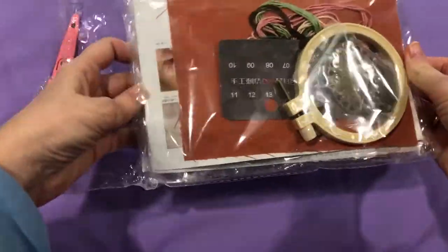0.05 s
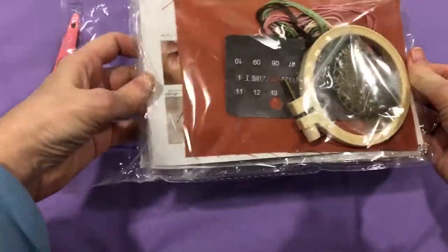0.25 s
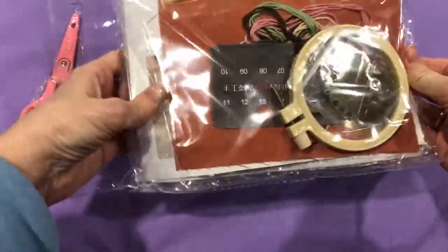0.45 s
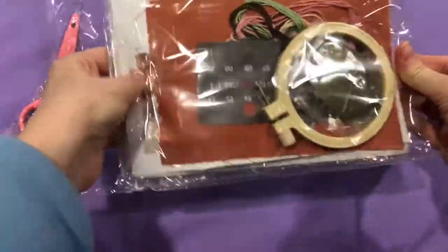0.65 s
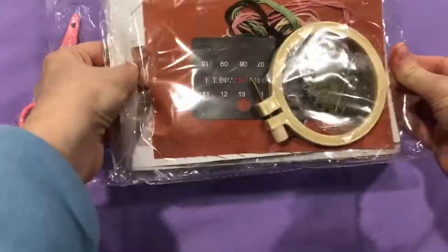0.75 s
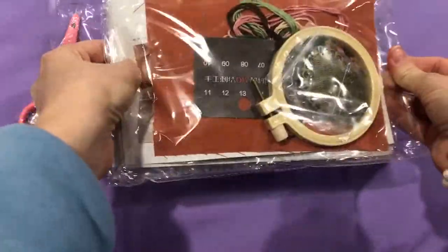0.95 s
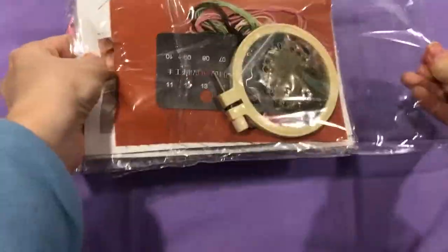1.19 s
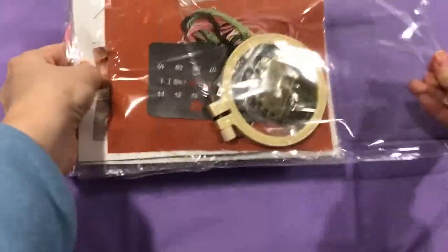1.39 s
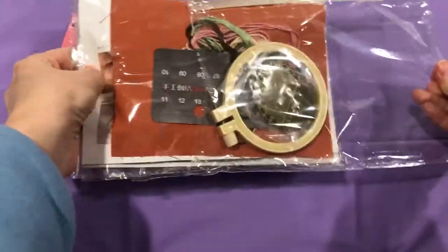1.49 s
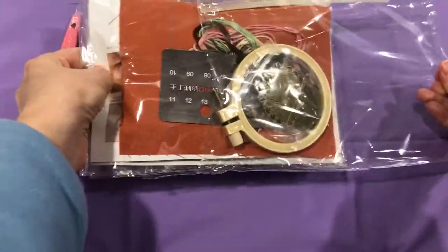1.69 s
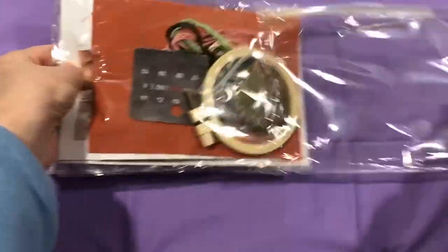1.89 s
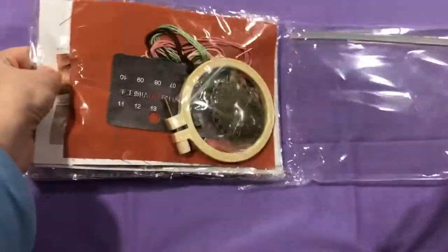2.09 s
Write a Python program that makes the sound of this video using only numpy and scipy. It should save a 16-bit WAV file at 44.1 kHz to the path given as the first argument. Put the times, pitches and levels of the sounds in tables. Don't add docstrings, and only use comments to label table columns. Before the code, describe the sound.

Stiff clear plastic crinkles close to a phone microphone. Crisp high snaps gather from 0.1 to 0.4 seconds, scatter through a new grip with dull panel pops near 0.7, then crowd into the loudest crackling, sliding rustle around 0.95-1.1. Sparse ticks and soft pops follow until a second burst at 1.73-1.85, thinning to a late snap near 2.1. Quiet, dry room.

```python
import sys
import numpy as np
from scipy import signal
from scipy.fft import rfft, irfft, next_fast_len
from scipy.io import wavfile
from scipy.ndimage import uniform_filter1d, map_coordinates

SR = 44100
rng = np.random.default_rng(int(sys.argv[2]) if len(sys.argv) > 2 else 0)


def volts_from_decibels(level):
    exponent = np.asarray(level, float) / 20
    return 10 ** exponent


def unload_audio(sound):
    columns = np.transpose(np.atleast_2d(sound))
    steps = np.round(np.clip(columns, -1, 1) * 32767)
    wavfile.write(sys.argv[1], SR, steps.astype(np.int16))


N = 94329

# start_s [s], energy_db [dB], centre_hz
# [Hz]
CREASE_SNAPS = [(0.06, -23, 6060), (0.0857, -17.5, 6900), (0.0882, -20, 6500), (0.0963, -14.5, 6500),
                (0.0998, -16.5, 6940), (0.154, -25, 3200.0), (0.1623, -18, 9200), (0.165, -13, 5530),
                (0.1787, -11, 11400), (0.2222, -13.5, 4850), (0.2503, -10, 6430), (0.2722, -18, 5300),
                (0.2765, -20, 3060), (0.2791, -6, 5040), (0.2853, -11.5, 6600), (0.3032, -20.5, 5400.0),
                (0.306, -22.5, 4500.0), (0.3142, -19, 2540), (0.3184, -5.5, 5500), (0.3325, -13.5, 2970),
                (0.3367, -6.5, 8100), (0.3434, -7.5, 9500), (0.364, -10.5, 5830), (0.365, -18, 3860),
                (0.3945, -9.5, 4430),
                (0.4151, -14, 6000), (0.4205, -26, 3950), (0.4558, -29, 3830), (0.481, -24.5, 4500),
                (0.5129, -13, 8150), (0.5188, -14, 9800), (0.5243, -11.5, 4030), (0.5437, -19.5, 6200.0),
                (0.5607, -25, 2170), (0.572, -20, 8900), (0.585, -20, 3520), (0.595, -13, 4020),
                (0.6149, -7, 5130), (0.6208, -14, 6450), (0.637, -16, 10700.0), (0.6496, -12.5, 2950),
                (0.6619, -16, 6360), (0.6661, -18, 5430), (0.69, -19.5, 3050), (0.6921, -21, 1710),
                (0.6994, -17, 4100), (0.7165, -18, 11300), (0.7503, -15.5, 2420), (0.759, -18, 6400),
                (0.779, -20.5, 3100),
                (0.796, -15, 6760), (0.8095, -22, 6940), (0.8289, -14, 5300), (0.8328, -18.5, 2960),
              (0.8436, -7.5, 13300), (0.8614, -16.5, 6740), (0.9049, -19, 4300), (0.9189, -15, 1320),
              (0.924, -16.5, 6700), (0.9394, -6.5, 5900), (0.9416, -20, 6130), (0.948, -9, 7600),
              (0.955, -26, 9800.0), (0.9591, -6, 12900), (0.97, -13, 2550), (0.974, -6, 8700),
              (0.9931, -7.5, 6400.0), (1.0061, -12.5, 3200), (1.0218, -5, 7300), (1.037, -9.5, 5900),
              (1.0606, -14.5, 7000), (1.067, -8, 8550), (1.0802, -19.0, 6300.0), (1.0833, -17, 4000.0),
              (1.088, -18.5, 2000),
                (1.093, -15.5, 7500), (1.1389, -19, 5650), (1.144, -22.5, 3730), (1.172, -29.5, 2100),
                (1.2113, -20.5, 4500), (1.217, -18, 5550), (1.235, -24, 1780), (1.247, -24, 3580),
                (1.2586, -7.5, 6100), (1.2729, -16.5, 4560), (1.2917, -23.5, 3660), (1.3195, -25.5, 4440),
                (1.3434, -19.5, 6900), (1.3572, -24.5, 2220), (1.3708, -24, 2280), (1.396, -22.5, 6300),
                (1.43, -30.5, 3620), (1.469, -25, 7440), (1.474, -28.5, 2550), (1.492, -14, 10100),
                (1.507, -26.5, 2100), (1.5315, -18, 9000), (1.5464, -20.5, 7200), (1.606, -36, 1800.0),
                (1.6147, -33, 1700.0),
                (1.64, -29, 1740), (1.6638, -19.0, 5060), (1.7, -24, 3450), (1.7271, -11.5, 7800),
                   (1.7284, -26, 5100.0), (1.7563, -16, 5640), (1.7612, -11, 5170), (1.7706, -12, 7500),
                   (1.7744, -11, 3600), (1.777, -11.5, 4430), (1.7813, -11, 7100), (1.8293, -15, 4620),
                   (1.8324, -22, 3860), (1.861, -18.5, 3900), (1.869, -15.5, 5160), (1.892, -16, 7300),
                   (1.914, -19, 6050), (1.9405, -19, 9200), (1.9657, -13.5, 5230), (2.0426, -15, 3540),
                   (2.054, -24, 3370), (2.0781, -6.5, 9600)]
# start_s [s], energy_db [dB], centre_hz [Hz]
FURTHER_SNAPS = [
    (0.274, -14, 4860),
    (0.3272, -18, 8000),
    (1.2584, -36, 9350),
                 (0.0117, -44.5, 5200), (0.0678, -46, 2500), (0.0768, -28, 6500), (0.197, -31, 1390),
               (.2315, -23, 4700), (.2985, -34, 6000), (.3258, -29, 8000), (0.4518, -28, 1510),
               (.462, -34, 3000), (.471, -31, 5300), (0.4918, -32, 5000), (0.4955, -29, 4100),
               (0.5007, -22, 2600), (.5052, -25.5, 2220), (.533, -25, 1500), (0.5387, -26, 5300),
               (0.5808, -27.5, 1200), (0.6043, -19, 8450), (.6094, -19, 7700), (.6178, -13, 8200),
               (0.7066, -32, 5300), (0.773, -25.5, 1600), (0.7857, -27.5, 1600), (.8705, -27, 2960),
               (.882, -33.5, 6400), (0.8992, -27, 1300), (0.909, -29, 4700), (.9555, -14, 9000),
               (0.9873, -9.5, 1940), (1.011, -10.5, 4500), (1.0413, -18, 7000), (1.053, -23, 2900),
               (1.0693, -18, 4970), (1.1108, -31, 4000), (1.1179, -33, 9000), (1.1572, -37, 3620),
               (1.3325, -28, 6940), (1.354, -29, 6500), (1.3815, -25.5, 9000), (1.3927, -26.5, 1380),
               (1.398, -24, 6000), (1.4205, -40, 6960), (1.46, -34, 2000), (1.5237, -32, 2180),
               (1.6582, -27.5, 1300), (1.705, -29, 4730), (1.72, -39, 5000), (1.7403, -20.5, 10100),
               (1.7424, -22, 5300), (1.7534, -17.5, 7000), (1.7843, -16.5, 4400), (1.8033, -16, 8000),
               (1.8079, -16, 9700), (1.8107, -17, 5100), (1.8143, -17, 8500), (1.853, -25, 4500),
               (1.877, -18, 10000), (1.961, -25, 1100), (1.9889, -19, 3330), (2.089, -38, 4000),
                 (1.006, -7, 13000),
    (1.735, -24, 6000),
    (1.975, -27, 12000),
    (1.998, -30, 2980),
    (2.137, -35, 4500),
]
# start_s [s], energy_db [dB], pitch_hz [Hz]
PANEL_POPS = [(.154, -29.5, 770), (.223, -25.5, 820), (.394, -25, 1000), (.526, -25, 380), (.65, -30, 600),
              (.688, -18, 925), (.692, -17, 486), (.7, -33, 510), (.83, -27, 640), (1.211, -27.5, 700),
              (1.245, -25.5, 300), (1.257, -24, 940), (1.261, -23.5, 432), (1.272, -42, 218),
              (1.987, -27, 407), (1.995, -20, 200), (2.08, -27, 353), (2.087, -26, 280)]
# start_s [s], level_db [dB]
DRAG_LEVEL = [(.04, -72), (.14, -68.5), (.3, -55), (0.438, -68), (0.528, -53), (.74, -64.5), (0.944, -53),
              (0.961, -39.5), (1.029, -41.5), (1.194, -73), (1.268, -58), (1.389, -54), (1.45, -70.5),
              (1.67, -73.5), (1.738, -43.5), (1.82, -48.5), (2.001, -52.5), (2.06, -65)]
# frequency_hz [Hz], level_db [dB]
FILM_COLOUR = [(100, 0), (400, 9.5), (1200, 7.5), (5000, 2), (16000, -1.5)]
# frequency_hz [Hz], level_db [dB per Hz]
SLIDE_SPECTRUM = [(100, -3.5), (400, 1), (1500, 3.5), (5000, -2), (16000, -12.5)]
# frequency_hz [Hz], t60_s [s]
ROOM_T60 = [(300, 0.26), (3000, 0.078), (14000, 0.049)]
# frequency_hz [Hz], level_db [dB per Hz]
AIR_SPECTRUM = [(20, -12), (60, -3), (150, 2), (400, -9.5), (1000, -29), (5000, -47), (16000, -65)]

SMALL_HZ = 4500


def unit(x):
    return x / np.sqrt(np.mean(x ** 2) + 1e-20)


def along(points, hz):
    f, v = np.transpose(points)
    return np.interp(np.log(hz + 1), np.log(f + 1), v)


def filtered(x, response):
    m = next_fast_len(N + 8192)
    return irfft(rfft(x, m) * response(np.fft.rfftfreq(m, 1 / SR)), m)[:N]


def wobble(rate):
    knots = rng.standard_normal(int(N * rate / SR) + 4)
    return map_coordinates(knots, [np.arange(N) * rate / SR])


def noise(points):
    return unit(filtered(rng.standard_normal(N), lambda hz: volts_from_decibels(along(points, hz))))


def snaps(s, energy_db, centre_hz, size=512, lead=64):
    t60_s, tick = 0.0032, 2.1
    octaves_below, octaves_above, octaves_per_db = 1.49, 2.58, -0.02
    panel_db, panel_octaves = 9, .35
    spread_s = 0.001109
    t, hz = np.arange(size) / SR, np.fft.rfftfreq(size, 1 / SR) + 1
    energy, centre = energy_db[:, None], centre_hz[:, None]
    draw = rng.standard_normal((len(s), size + 2))

    decay_s = t60_s * np.exp(draw[:, -1:] / 5) * np.sqrt(SMALL_HZ / centre)
    age = np.log(1000) * t / decay_s
    burst = draw[:, :size] * (age * np.exp(-age) + tick * np.exp(-age * 5))
    spectrum = rfft(burst)
    even = spectrum / np.sqrt(uniform_filter1d(np.abs(spectrum) ** 2, size=49, axis=1) + 1e-9)

    away = np.log2(hz / centre)
    reach = np.where(away > 0, np.clip(octaves_above + octaves_per_db * energy, 1, 10), octaves_below)
    panel = panel_db * np.exp(-(away / panel_octaves) ** 2)
    colour = volts_from_decibels(along(FILM_COLOUR, hz) - 3.53 * (away / reach) ** 2 + panel)

    distance = spread_s * np.exp(0.399 * draw[:, -2:-1])
    travel = distance * 2 * (np.sqrt(1000 * (hz + 200)) - hz / 8)
    wave = irfft(even * colour * np.exp(-2j * np.pi * (travel + hz * lead / SR)), size)
    wave *= (volts_from_decibels(energy_db) / np.linalg.norm(wave, axis=1))[:, None]
    at = np.round(s * SR).astype(int)[:, None] + np.arange(size)
    return np.bincount(at.ravel(), wave.ravel(), N + 2 * size)[lead:N + lead]


def creases(count=3):
    snap_db, after_db, after_scatter_db, after_s = -0.5, -20, 3, .003
    clear = CREASE_SNAPS
    s, db, hz = np.transpose(clear + FURTHER_SNAPS)
    draw = rng.standard_normal((3, len(s), count))
    later = s[:, None] + after_s * (draw[0] ** 2 + 0.45)
    weaker_db = db[:, None] + after_db + after_scatter_db * draw[2]
    pitch = hz[:, None] * 2 ** (draw[1] / 2)
    after = snaps(np.clip(later.ravel(), 0, N / SR), weaker_db.ravel(), pitch.ravel())
    return snaps(s, db + snap_db, hz) + after


def pops(size=1024):
    cycles, roughness = 4.5, .7
    out, t = np.zeros(N + size), np.arange(size) / SR
    for s, db, hz in PANEL_POPS:
        rough = 1 + roughness * unit(uniform_filter1d(rng.standard_normal(size), size=128))
        ring = np.sin(2 * np.pi * hz * t) * rough
        wave = np.gradient(ring * t * volts_from_decibels(-60 * t * hz / cycles))
        out[round(s * SR):][:size] += volts_from_decibels(db) * wave / np.linalg.norm(wave)
    return out[:N]


def drag():
    return np.interp(np.arange(N) / SR, *np.transpose(DRAG_LEVEL))


def small_snaps(drag_db, count=2400):
    small_db, scatter_db, octaves = 8, 4, .8
    draw = rng.random((count, 4))
    s = draw[:, 0] * (N - 1) / SR
    drag_then = drag_db[(s * SR).astype(int)]
    size_db = -scatter_db * np.log(draw[:, 1] * .97 + .03)
    spread = octaves * 2 * (draw[:, 2] + draw[:, 3] - 1)
    pitch = SMALL_HZ * 2 ** (spread + (drag_then + 45.5) / 30)
    return snaps(s, drag_then + size_db + small_db, pitch)


def sliding(drag_db):
    slide_db, grows, wobble_db, brightens = -9, 1, 3.5, 0.99
    unsteady = wobble(44.97) / 2 + 1.46 * wobble(220)
    swell = grows * (drag_db + 53.0) - 48.0 + wobble_db * unsteady
    slide = noise(SLIDE_SPECTRUM)
    dull = filtered(slide, lambda hz: 1 / (1 + (hz / 5000) ** 2))
    bright = volts_from_decibels(brightens * (drag_db + 54)) * (slide - dull)
    return volts_from_decibels(slide_db + swell) * (dull + bright)


def rustle():
    drag_db = drag()
    return small_snaps(drag_db) + sliding(drag_db)


def card():
    card_db, grows, card_hz, lumps_db = -63.5, 1.17, 280, 3
    response = lambda f: f * card_hz / np.abs(card_hz ** 2 - f * f + 1.3j * f * card_hz)
    body = unit(filtered(rng.standard_normal(N), response))
    return volts_from_decibels(card_db + grows * (drag() + 50) / 2 + lumps_db * wobble(25)) * body


def room(x, piece=4096):
    wall_s = 0.0076
    out = np.zeros(N + SR)
    for start in range(0, N, piece):
        hz, t, z = signal.stft(rng.standard_normal(SR // 4), SR, nperseg=128)
        decay = volts_from_decibels(-60 * t / along(ROOM_T60, hz)[:, None])
        tail = signal.istft(z * decay, SR, nperseg=128)[1]
        tail *= np.clip(np.arange(len(tail)) / SR / wall_s, .25, 1) ** 2
        wet = signal.fftconvolve(x[start:start + piece], tail / np.linalg.norm(tail))
        out[start:start + len(wet)] += wet
    return out[:N]


def air():
    return volts_from_decibels(-68) * noise(AIR_SPECTRUM)


def scene():
    sleeve = creases() + pops() + rustle() + card()
    return (sleeve + volts_from_decibels(-17.5) * room(sleeve) + air())[None]


def band_limit(x):
    return signal.sosfilt(signal.butter(12, 17150, fs=SR, output="sos"), x)


def record(dry):
    shelf_hz, shelf_db, top_hz = 15950, 20, 17000
    quiet_hz, quiet_db = 12300, -79
    edge = lambda hz, limit: np.clip((limit - hz) / 200, 0, 1)
    main = filtered(dry[0], lambda hz: edge(hz, shelf_hz) * hz ** 2 / (hz ** 2 + 40 ** 2))

    high = main - filtered(main, lambda hz: edge(hz, quiet_hz))
    faint = uniform_filter1d(high ** 2, size=512) < volts_from_decibels(2 * quiet_db)
    main = main - high * uniform_filter1d(faint * 1., size=256)

    top = filtered(dry[0], lambda hz: edge(hz, top_hz) - edge(hz, shelf_hz))
    usual = uniform_filter1d(top ** 2, size=2048)
    stands_out = uniform_filter1d(top ** 2, size=64) > volts_from_decibels(shelf_db) * usual
    mix = main + top * uniform_filter1d(stands_out * 1., size=128)
    return band_limit(mix[None])


dry = scene()
out = record(dry)
unload_audio(out)
```